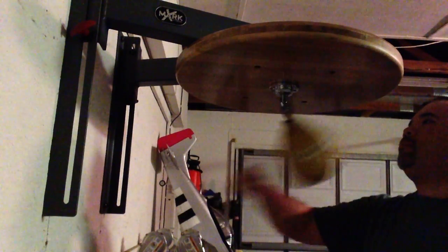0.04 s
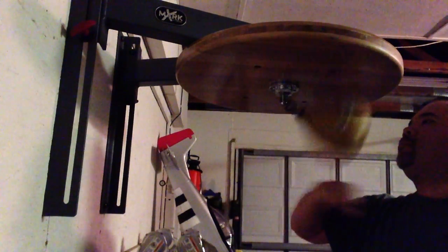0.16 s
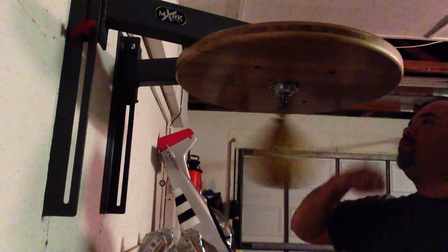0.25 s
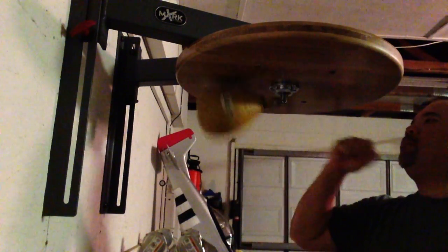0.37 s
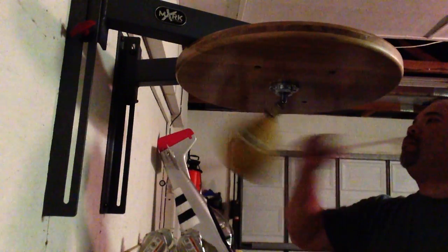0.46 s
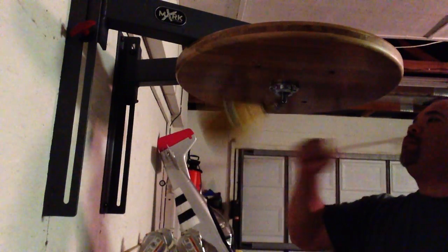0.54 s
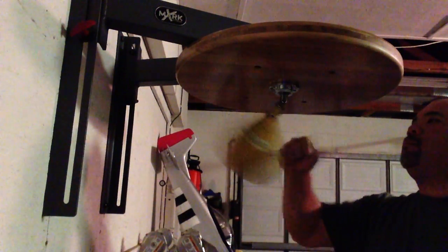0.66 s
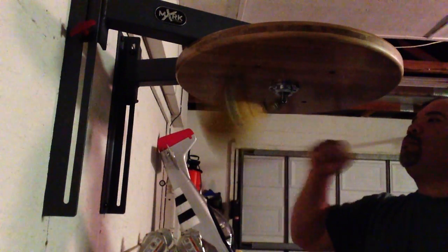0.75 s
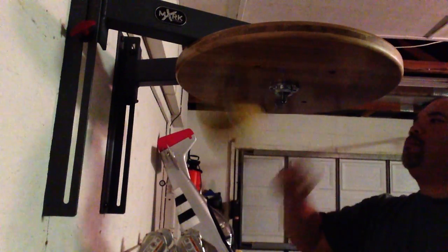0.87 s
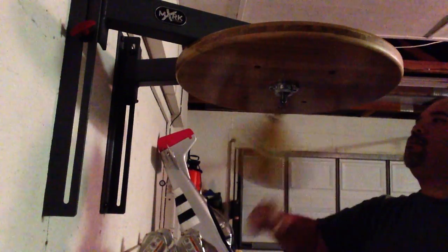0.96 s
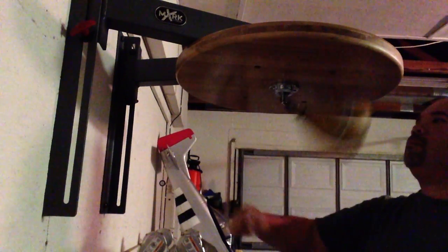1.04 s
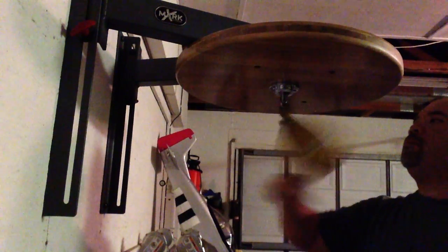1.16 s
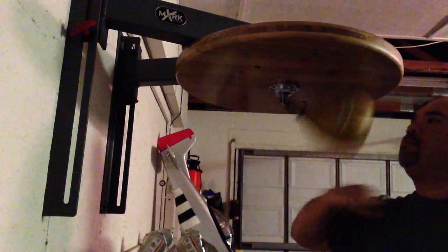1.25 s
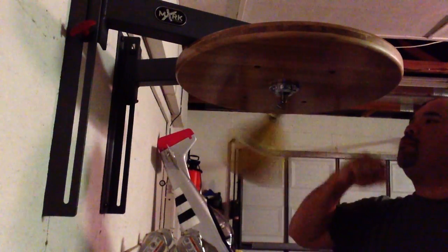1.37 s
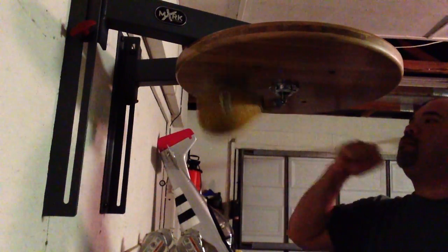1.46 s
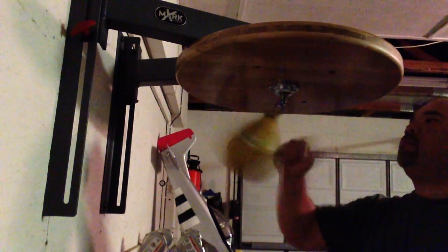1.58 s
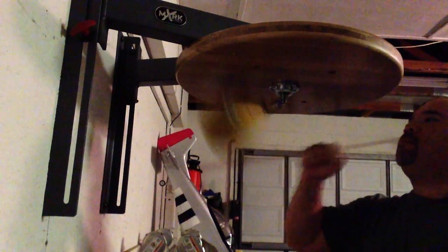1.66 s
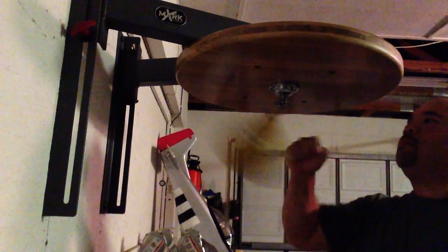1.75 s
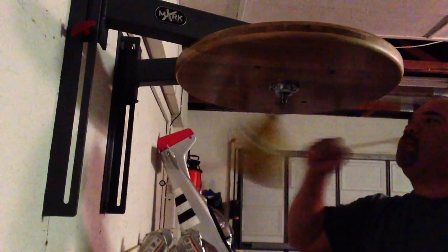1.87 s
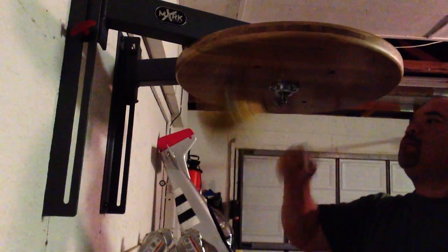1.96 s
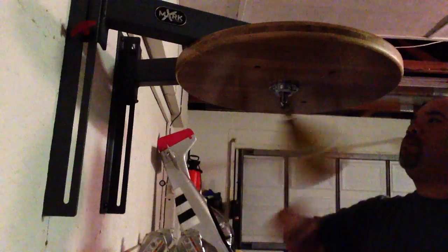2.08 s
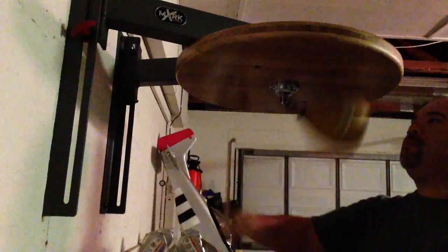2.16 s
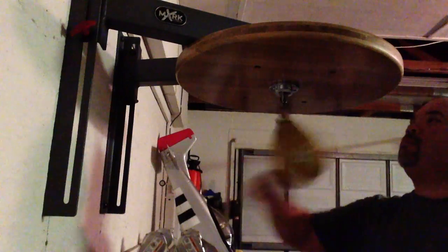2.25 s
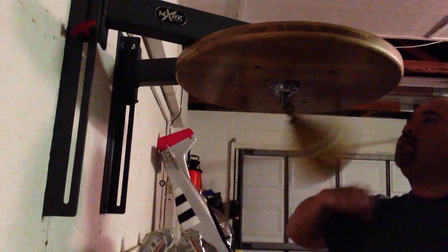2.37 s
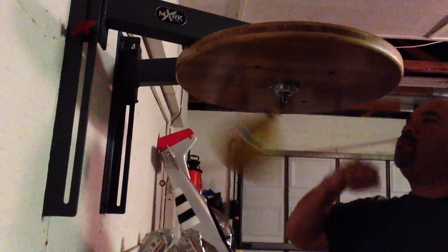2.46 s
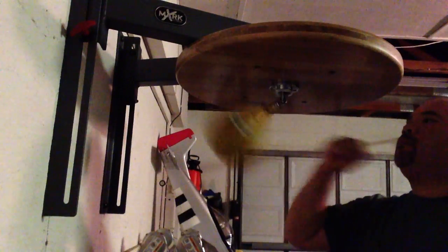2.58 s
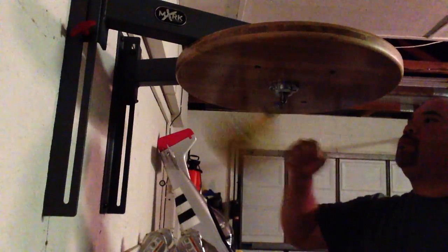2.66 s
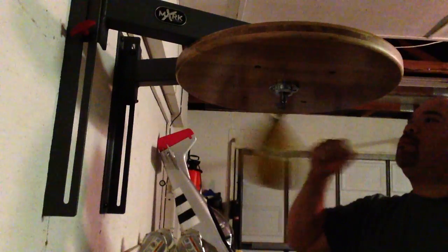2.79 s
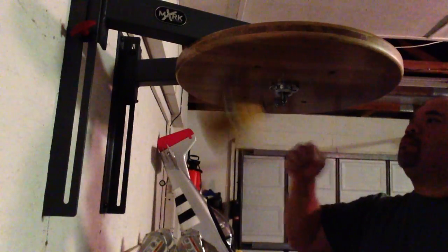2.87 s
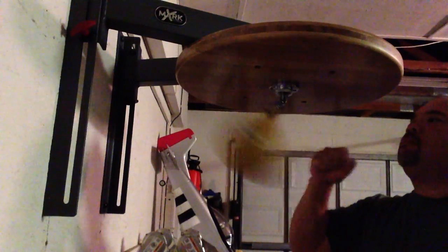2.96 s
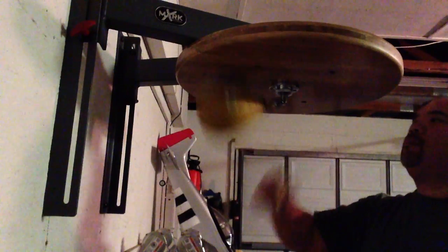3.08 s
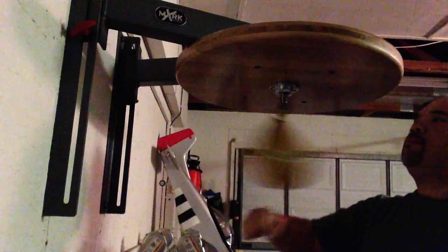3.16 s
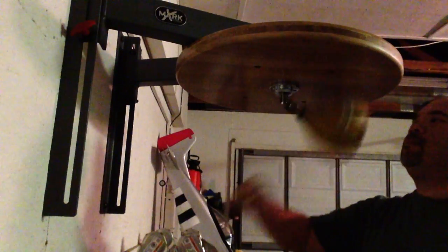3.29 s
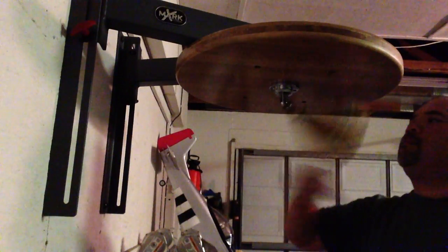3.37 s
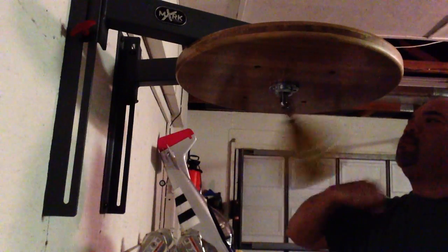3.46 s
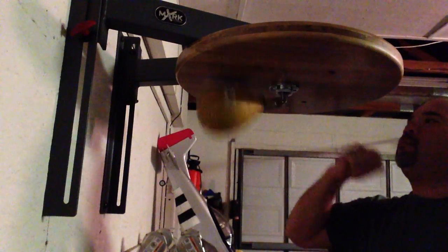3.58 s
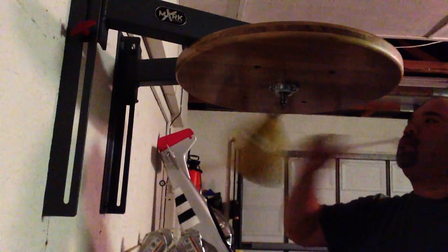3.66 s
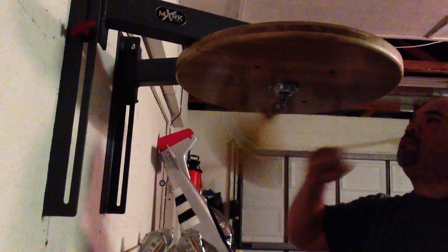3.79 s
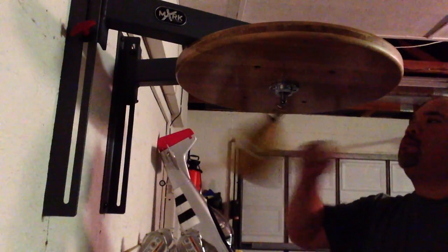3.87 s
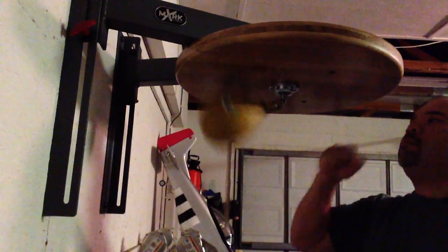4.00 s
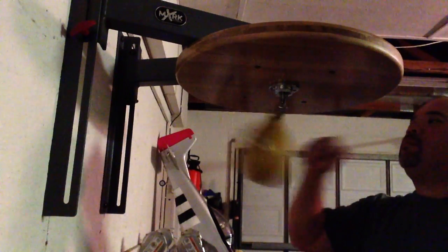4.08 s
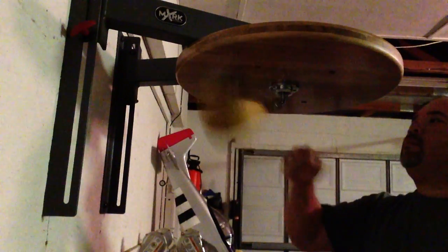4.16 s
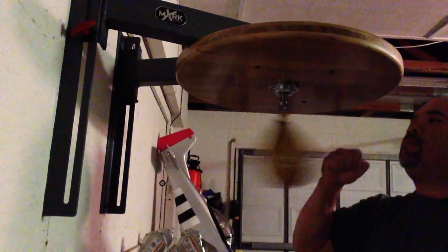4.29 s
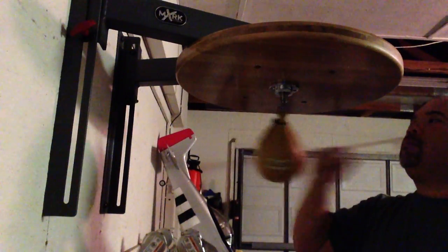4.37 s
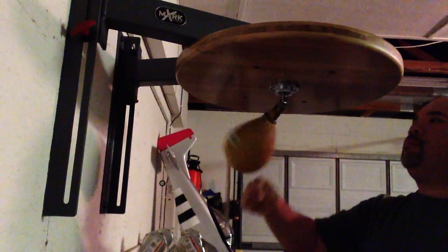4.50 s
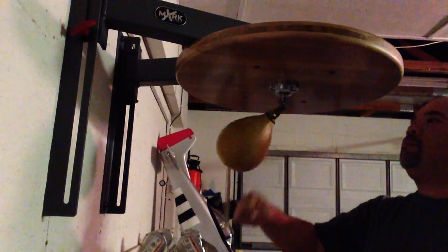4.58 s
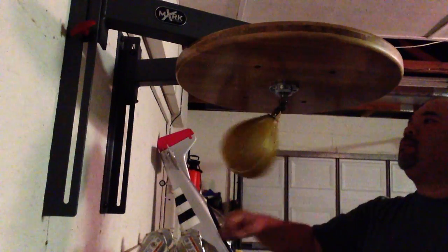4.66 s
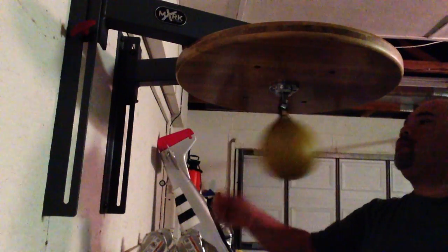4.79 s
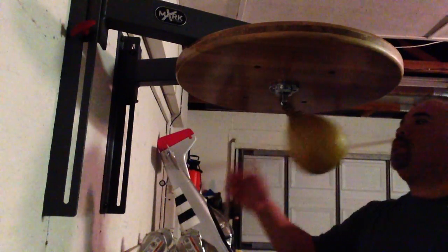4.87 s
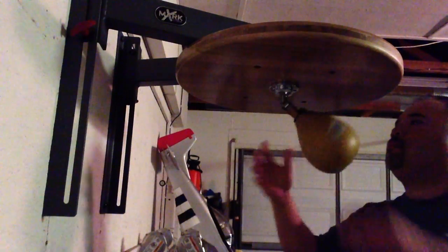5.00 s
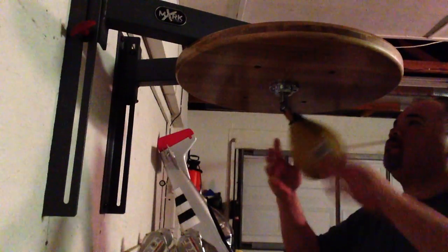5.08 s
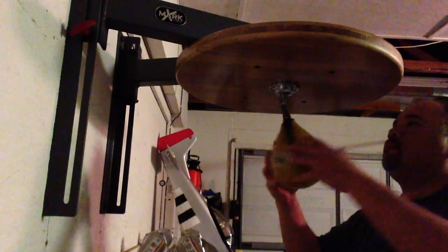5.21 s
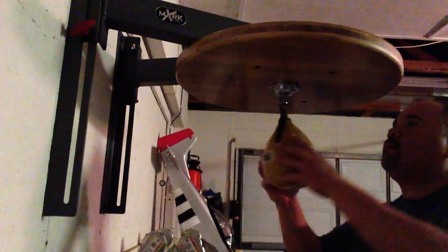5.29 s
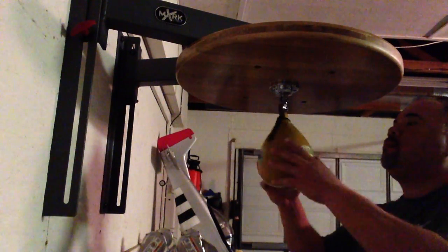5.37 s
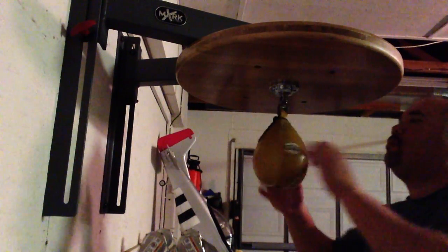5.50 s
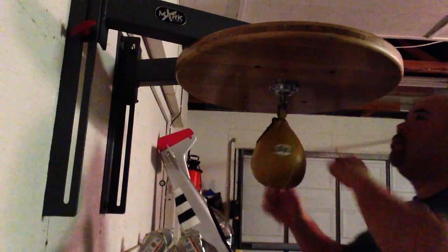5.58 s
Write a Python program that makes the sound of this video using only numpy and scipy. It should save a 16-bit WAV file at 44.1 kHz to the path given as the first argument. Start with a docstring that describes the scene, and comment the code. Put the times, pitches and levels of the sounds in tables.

```python
"""In a garage, a leather speed bag is punched in a fast rattle against a round wooden platform.
Each swing tugs the loose steel frame, slaps the board and sets its modes booming; then the swivel
clicks and the frame drops back. A few rough blows shake the whole frame, and the room reverberates.
At the end the bag swings out with a faint stick-slip squeak and is caught in the hands."""
import sys
import numpy as np
from scipy import signal
from scipy.io import wavfile

SR = 44100
rng = np.random.default_rng(int(sys.argv[2]) if len(sys.argv) > 2 else 0)


def generate_wav(signal):
    """Clip the signal to [-1, 1] and save it as 16-bit WAV at the path in sys.argv[1]."""
    frames = np.transpose(np.atleast_2d(signal))
    scaled = np.clip(frames, -1, 1) * 32767
    pcm = np.round(scaled).astype(np.int16)
    wavfile.write(sys.argv[1], SR, pcm)


N = 248724

# Spectra. Each row: frequency in Hz, relative level in dB.
AIR_SPECTRUM = [(18, -46.5), (30, -22), (71, 1), (374, -1), (448, 6.5), (538, -7), (1650, -8.5),
                (4900, -13.5), (8690, -18), (10700, -17), (15000, -16.5)]  # steady background
LINGERING_SPECTRUM = [(50, -10), (120, 16), (200, 16.5), (350, -7), (1600, 9), (4000, -4.5), (15000, -30.5)]  # dying sound of blows struck before the scene opens
ROOM_SPECTRUM = [(60, -9), (200, 3.5), (600, 7), (1500, -4.5), (4000, -2.5), (9000, 0.5), (15000, 0)]  # echoes of the garage
PALM_SPECTRUM = [(100, -1), (450, 3.5), (1500, -2), (3000, -8.5), (6000, -5.5), (15000, -7.5)]  # palms rubbing leather
CLICK_SPECTRUM = [(100, -27), (1500, -9.5), (3500, -13), (6500, -7), (9000, -14), (11500, -5.5),
                  (13000, -6), (14800, 0.5)]  # steel on steel in the swivel
CHATTER_SPECTRUM = [(60, -29.5), (300, -15), (700, -23.5), (1000, -6), (1500, 1), (2400, -0.5), (3500, -8),
                    (6000, -13.5), (10000, -25), (15000, -26)]  # loose joints of the frame
FIST_SPECTRUM = [(30, -18), (150, -1.5), (450, -2), (900, 6), (1700, 5), (4000, 0), (9000, -3.5),
                 (15000, -6.5)]  # fist on bag
SLAP_SPECTRUM = [(30, -22), (100, -18.5), (300, -12.5), (900, -3.5), (1600, 2), (4000, 0.5), (6000, -1.5),
                 (9000, -9.5), (12000, -10.5), (15000, -11.5)]  # bag on board
# Reverberation of the garage. Each row: frequency in Hz, time to fall 60 dB in seconds.
ROOM_DECAY = [(100, 1.2), (400, 0.47), (1500, 0.49), (3000, 0.44), (6000, 0.3148), (15000, 0.22)]

# Normal modes. Each row: frequency in Hz, relative level in dB, time to fall 60 dB in seconds.
ARM_MODES = [(445.4, 1.5, 0.43), (499, -1, .13)]  # hollow mounting arm
FRAME_MODES = [(877.6, 3, 0.28), (978, -4, 0.4), (1005, -1, 0.53), (1193, -5, 0.73), (1326, -7, 0.12),
               (1553, 0.5, 0.16), (1686, 4.5, 0.28), (1766, -0.5, 0.43), (2111, -8.5, 0.16),
               (2370, 0, 0.27), (2487, -3, 0.19)]  # steel frame
SWIVEL_MODES = [(4710, -6, .04), (7000, -8, .025), (11950, 6, 0.012), (13400, 1, .025)]  # steel swivel
BOARD_MODES = [(116, -7.5, 0.35), (149, -2.5, 0.31), (160, -5.5, .2), (185, -7.5, 0.52), (207.9, -2, 0.77),
               (237, -8.5, 0.24), (263.4, -6.5, 0.26), (303, -14.5, 0.13)]  # wooden platform

# Event levels are relative within a column; brightness is the gain of a treble shelf.
# The swivel squeaks as the bag swings out.
# Each row: start in seconds, length in seconds, pitch in Hz, fall of pitch in Hz, level in dB.
SWIVEL_SQUEAKS = [(4.589, 0.21, 4700, 100, -71), (4.737, .05, 11200, 700, -76),
                  (4.79, 0.045, 11300, 1005, -75)]
# Hands catch the bag. Each row: start in seconds, fade time in seconds, level in dB, brightness in dB.
HAND_GRIPS = [(5.168, .05, -74, -3), (5.296, 0.091, -62, -2.5), (5.387, 0.14, -66.5, 4),
              (5.5, 0.12, -67.5, -4.5)]
# The mounting arm shifts with a knock. Each row: start in seconds, level in dB.
ARM_KNOCKS = [(0.592, -11.5), (2.912, -17), (4.208, -11), (5.13, -34.5)]
# The swivel snaps against its socket as the bag flies off line. Each row: start in seconds, level in dB.
SWIVEL_SNAPS = [(0.0525, -2.5), (0.1995, 5.5), (0.2388, 2), (0.4688, -1.7), (0.589, -4.5), (1.3079, 0),
                (1.3276, 1), (1.385, -5), (1.694, -11), (1.8275, -1), (1.9965, -7.5), (2.3409, 4.5),
                (2.39, 7), (2.4198, -4), (2.47, -3.5), (2.757, -11), (2.908, -0.5), (3.9318, -7.5),
                (4.2045, -4), (4.4023, 2), (4.457, 0), (4.5244, -14.5), (4.8592, -21.5), (5.0377, -13.5)]
# Rough blows and stray swings jolt the frame. Each row: start in seconds, level in dB, brightness in dB.
FRAME_JOLTS = [(0.052, -0.5, 0), (0.1545, 15, 4.5), (0.1647, 10.5, 3), (0.1859, 12.5, 9.5), (1.0986, 3, -8),
               (1.2454, 16, 5.5), (1.3067, 14.5, 8), (2.0767, 1, 3), (2.18, 1.9, -6), (2.3409, 15.5, 5.5),
               (2.3803, 9, 4), (2.3973, 18.5, 0.5), (3.2979, 6, -9), (3.459, 5.5, 8.5), (3.495, 2, 13.5),
               (4.4048, 6, 4.5), (4.6977, -27, -7), (4.859, -14.5, -8), (5.0872, -22.5, -18)]
# The fist hits the bag. Each row: start in seconds, smack level in dB, boom level in dB.
FIST_PUNCHES = [(0.143, -2.6, -8), (0.561, -8, -11), (0.74, -11, -8), (0.9025, -9, -10),
                (1.2324, -18, -14.5), (1.8104, -12, -13), (1.9802, -11, -15), (2.3296, -5, -11.5),
                (2.718, -14, -14.5), (2.888, -5.5, -14), (3.075, -11, -11), (3.428, -7.5, -6.5),
                (3.7629, -9, -9.5), (3.9124, -18, -59.5), (4.1806, -11, -16), (4.3875, -11.5, -25.5),
                (5.176, -34.5, -36)]
# The bag hits the board. Each row: start in seconds, slap level in dB, brightness in dB, boom level in dB.
BAG_SLAPS = [(0.0253, 3.5, 0, -11.5), (0.2185, 2, 3, -7.5), (0.4472, 5, -19.5, -8.5),
             (0.6437, 9, -10, -4.5), (0.8068, 6.5, 3.5, -3.5), (0.9722, 5, 6.5, -5), (1.1431, 3, 5.5, -11),
             (1.5466, 0.3, -3.5, -13.5), (1.6591, -4, 2.3, -12), (1.7219, 7, 3, -3.5),
             (1.885, 6, 3.5, -4.5), (2.051, 6, 5.5, -3.5), (2.2273, 5, -2.5, -8.5),
             (2.606, 1, -12.5, -10.5), (2.7887, 6.5, 4.5, -4), (2.9751, 5, 6.5, -4), (3.1562, 6, 4.5, -5.5),
             (3.3455, 1.5, 6.5, -8.5), (3.4776, 6, 8, -3.5), (3.6627, 4.5, 3.5, -6), (3.825, 6, 5, -4),
             (4.0453, -3.5, 2.5, -14), (4.26, 5, 4.2, -5)]

HARD_SWING_DB = -4.5  # boom level that marks a hard swing


def amp(db):
    """The amplitude ratio for a level in decibels."""
    return 10 ** (np.asarray(db) / 20)


def unit_energy(x):
    """Normalisation to an energy of one."""
    return x / np.sqrt(np.sum(x ** 2) + 1e-20)


def curve_at(points, hz):
    """Linear interpolation on a log-frequency axis."""
    point_hz, value = np.transpose(points)
    return np.interp(np.log(hz + 1), np.log(point_hz + 1), value)


def add(mix, start_s, sound):
    """Superposition: a sound adds to the mix from its start time."""
    part = mix[max(round(start_s * SR), 0):][:len(sound)]
    part += sound[:len(part)]


def convolve(x, response):
    """Convolution gives a linear system's output, here cut at the scene's length."""
    return signal.oaconvolve(x, response)[:N]


def bandpass(x, low_hz, high_hz):
    """A Butterworth filter attenuates what lies outside the band."""
    return signal.sosfilt(signal.butter(2, [low_hz, high_hz], "band", fs=SR, output="sos"), x)


def impulses(rows, db_column):
    """Brief blows act as impulses: one for each row, sized by the given column."""
    out = np.zeros(N)
    for row in rows:
        add(out, row[0], amp([row[db_column]]))
    return out


def pulse(spectrum, bright_db=0, treble_hz=4500, body_db=0, body_hz=1300, size=2048):
    """Minimum phase gives the sharpest causal pulse of a spectrum, here with treble and bass shelves."""
    hz = abs(np.fft.fftfreq(size, 1 / SR))
    treble = 1 - 1 / (1 + (hz / treble_hz) ** 4)
    bass = 1 / (1 + (hz / body_hz) ** 4)
    log_gain = np.log(amp(curve_at(spectrum, hz) + bright_db * treble + body_db * bass))
    return np.fft.ifft(np.exp(np.conj(signal.hilbert(log_gain)))).real


def ring(modes, detune=1, size=32768):
    """A struck body vibrates as a sum of damped normal modes."""
    t = np.arange(size) / SR
    partials = (amp(db - 60 * t / t60) * np.cos(2 * np.pi * hz * detune * t) for hz, db, t60 in modes)
    return unit_energy(sum(partials))


def crackle(decay_s, size=1024):
    """Many tiny contacts merge into exponentially decaying noise."""
    return unit_energy(rng.standard_normal(size) * np.exp(-np.arange(size) / SR / decay_s))


def noise(spectrum, bright_db=0, grain=0, size=N):
    """Filtered noise of rms one; random amplitude modulation makes it grainy."""
    white, roughness = rng.standard_normal((2, size))
    coloured = convolve(white * np.exp(grain * roughness), pulse(spectrum, bright_db))
    return np.sqrt(size) * unit_energy(coloured[:size])


def room_air():
    """Stationary noise forms the faint background of the garage."""
    return amp(-71) * noise(AIR_SPECTRUM)


def lingering_echo(start_db=-45, fall_db_per_s=110):
    """Reverberation of punches struck before the scene opens decays exponentially."""
    return amp(start_db - fall_db_per_s * np.arange(N) / SR) * noise(LINGERING_SPECTRUM)


def garage_reverb(x, first_echo_s=0.0017, build_s=0.0024, density=0.15, drift_hz=0.643, tails=3):
    """Diffuse echoes die at each band's own rate; crossfaded tails vary them as the bag moves."""
    t, out = np.arange(SR) / SR, np.zeros(N)
    onset = np.clip((t - first_echo_s) / build_s, 0, 1)
    for k in range(tails):
        echoes = rng.standard_normal(SR) * (rng.random(SR) < density) * onset
        hz, age_s, bands = signal.stft(echoes, SR, nperseg=256)
        decay = amp(-60 * age_s / curve_at(ROOM_DECAY, hz)[:, None])
        colour = amp(curve_at(ROOM_SPECTRUM, hz))[:, None]
        tail = unit_energy(signal.istft(bands * decay * colour, SR, nperseg=256)[1])
        share = np.sqrt(2 / tails) * np.cos(np.pi * (2 * drift_hz * np.arange(N) / SR + k / tails))
        out += convolve(x * share, tail)
    return out


def swivel_squeaks(jitter_hz=1500):
    """Stick-slip friction makes a thin, fuzzy whistle that swells, sinks in pitch and fades."""
    out = np.zeros(N)
    for start_s, length_s, hz, fall_hz, db in SWIVEL_SQUEAKS:
        progress = np.linspace(0, 1, int(length_s * SR))
        jitter = rng.standard_normal(SR)[:len(progress)]
        pitch_hz = hz - fall_hz * progress + jitter_hz * jitter
        swell = np.sqrt(abs(np.sin(np.pi * progress)))
        add(out, start_s, amp(db) * swell * np.sin(2 * np.pi * np.cumsum(pitch_hz) / SR))
    return out


def hand_rubs(attack_s=0.014):
    """Sliding friction gives a grainy rub as each palm comes to rest on the leather."""
    out, t = np.zeros(N), np.arange(SR // 2) / SR
    for start_s, fade_s, db, bright_db in HAND_GRIPS:
        rub = noise(PALM_SPECTRUM, bright_db, grain=0.9, size=len(t))
        envelope = np.minimum(t / attack_s, 1) * np.exp(-(t / fade_s) ** 2)
        add(out, start_s, amp(db) * envelope * rub)
    return out


def arm_hum():
    """The hollow arm resonates after its own knocks and, more weakly coupled, after slaps and jolts."""
    force = impulses(ARM_KNOCKS, db_column=1)
    force += amp(-11) * impulses(BAG_SLAPS, db_column=3)
    force += amp(-24) * impulses(FRAME_JOLTS, db_column=1)
    return bandpass(convolve(force, ring(ARM_MODES)), 300, 700)


def joint_knocks(tug_lead_s=0.0238, tug_s_per_db=0.0013, drop_s=0.0435, bounce_s=0.0165):
    """Play in the joints lets them knock. Each row: start in seconds, level in dB, brightness in dB."""
    swings = []
    for start_s, _, bright_db, boom_db in BAG_SLAPS:
        force_db = boom_db - HARD_SWING_DB
        # The bag tugs the frame just before landing, later and harder on a hard swing.
        tug = (start_s - tug_lead_s + tug_s_per_db * force_db, 1 + 2.2 * force_db, bright_db - 7)
        drop = (start_s + drop_s, -4, bright_db - 6)  # the frame falls back under its own weight
        swings += [tug, drop]
    bounces = [(start_s + bounce_s, db - 11, bright_db) for start_s, db, bright_db in FRAME_JOLTS]
    return swings + FRAME_JOLTS + bounces


def frame_ring(build_s=0.0066):
    """The steel frame's modes build up as each shock spreads through its bars, then decay freely."""
    force = amp(-17) * impulses(joint_knocks(), db_column=1)
    force += amp(-21) * impulses(BAG_SLAPS, db_column=1)
    force += amp(-17) * impulses(FIST_PUNCHES, db_column=1)
    bars = ring(FRAME_MODES)
    onset = np.clip(np.arange(len(bars)) / SR / build_s, 0, 1)
    return convolve(force, bars * onset)


def swivel_turns(delay_s=0.016, snap_window_s=0.04):
    """Rebound turns the swivel, unless a snap just has. Each row: start in seconds, level in dB."""
    turns = []
    for start_s, _, bright_db, boom_db in BAG_SLAPS:
        if not any(0 < start_s - snap_s < snap_window_s for snap_s, _ in SWIVEL_SNAPS):
            db = -5 + 1.5 * (boom_db - HARD_SWING_DB) + 0.53 * bright_db
            turns.append((start_s + delay_s, db))
    return turns


def swivel_clicks(ping_db=-18, detune_spread=0.088):
    """Hard steel contacts give bright clicks, each with a ping that depends on the point of contact."""
    out, click = np.zeros(N), pulse(CLICK_SPECTRUM)
    for start_s, db in SWIVEL_SNAPS + swivel_turns():
        ping = ring(SWIVEL_MODES, detune=1 + detune_spread * rng.uniform(-1.3, 1), size=2048)
        add(out, start_s, amp(db) * convolve(crackle(decay_s=0.0025), click + amp(ping_db) * ping))
    return out


def joint_rattles(peak_s=0.0039, spread_s=0.0025, density=0.6, size=640):
    """Loose joints chatter by repeated impact; harder knocks move more mass and sound fuller."""
    out, t = np.zeros(N), np.arange(size) / SR
    swell = np.exp(-((t - peak_s) / spread_s) ** 2 / 2)
    for start_s, db, bright_db in joint_knocks():
        contacts = rng.standard_normal(size) * (rng.random(size) < density) * swell
        knock = pulse(CHATTER_SPECTRUM, bright_db, treble_hz=4170, body_db=0.33 * (db - 10), body_hz=600)
        chatter = np.linalg.norm(knock) * unit_energy(convolve(contacts, knock))
        add(out, start_s, amp(db) * chatter)
    return out


def bag_throb(db, tight_hz=250, slack_hz=132, relax_s=0.0063, attack_s=0.00033, decay_s=0.012):
    """Tension sets the squeezed bag's pitch: higher after a harder blow, sinking as it springs back."""
    t = np.arange(4096) / SR
    stiffening = amp(0.11 * (db + 6.5))  # scales the whole glide
    hz = (slack_hz + (tight_hz - slack_hz) * np.exp(-t / relax_s)) * stiffening
    envelope = np.exp(-t / decay_s) * (1 - np.exp(-t / attack_s))
    return amp(db) * unit_energy(np.sin(2 * np.pi * np.cumsum(hz) / SR) * envelope)


def bag_and_board_boom():
    """Blows excite the bag's throb and the platform's modes; the unbaffled disc radiates no deep bass."""
    throbs = np.zeros(N)
    for start_s, *_, boom_db in [*BAG_SLAPS, *FIST_PUNCHES]:
        add(throbs, start_s, bag_throb(boom_db))
    force = impulses(BAG_SLAPS, db_column=3) + impulses(FIST_PUNCHES, db_column=2)
    force += amp(-30) * impulses(joint_knocks(), db_column=1)
    board = convolve(force, ring(BOARD_MODES))
    return bandpass(amp(-4) * throbs + amp(-3) * board, 85, 700)


def fist_smacks():
    """A yielding contact spreads the force in time: the fist sinks into the leather with a soft smack."""
    force = np.zeros(N)
    for start_s, db, _ in FIST_PUNCHES:
        add(force, start_s, amp(db) * crackle(decay_s=0.01))
    return convolve(force, pulse(FIST_SPECTRUM))


def bag_slaps(rebound_s=0.00053, rebound_gain=0.65, crease_gain=0.56, dispersion=0.61):
    """The taut bag's flat impact gives a crack that repeats at once; then the leather creases."""
    out = np.zeros(N)
    for start_s, db, bright_db, _ in BAG_SLAPS:
        crack = amp(db - 4) * pulse(SLAP_SPECTRUM, bright_db, treble_hz=4370)
        gap_s = rebound_s * rng.uniform(0.96, 1.04)
        add(out, start_s, crack)
        add(out, start_s + gap_s, rebound_gain * crack)
        add(out, start_s + 2 * gap_s, crease_gain * convolve(crackle(decay_s=0.0069), crack))
    # Bending waves in the board disperse: an all-pass filter makes the lows trail the highs.
    return signal.lfilter([dispersion, -1], [1, -dispersion], out)


def scene():
    """Direct sound, reverberation and the quiet sounds around them superpose in one channel."""
    slaps, smacks, boom = bag_slaps(), fist_smacks(), bag_and_board_boom()
    rattles, clicks = joint_rattles(), swivel_clicks()
    direct = amp(2) * slaps + amp(1) * smacks + amp(-1) * boom + amp(1) * rattles + amp(4.5) * clicks
    ringing = frame_ring() + arm_hum()
    into_room = amp(-7) * slaps + amp(-1.5) * (smacks + rattles) + amp(-14.5) * boom + amp(-2) * clicks
    reverb = garage_reverb(into_room)
    quiet = lingering_echo() + swivel_squeaks() + amp(2) * hand_rubs() + room_air()
    return (direct + ringing + reverb + quiet)[None]


def record(dry):
    """A linear-phase low-pass filter removes the highest treble."""
    cutoff_hz = 15400
    lowpass = signal.firwin(255, cutoff_hz, window=("kaiser", 8), fs=SR)
    return signal.oaconvolve(dry, lowpass[None], "same")


dry = scene()
out = record(dry)
generate_wav(out)
```